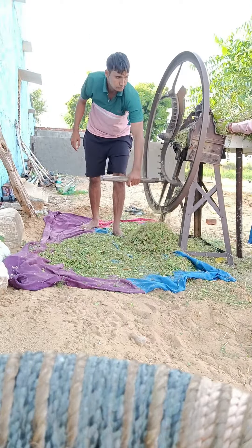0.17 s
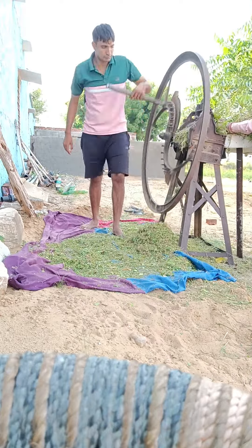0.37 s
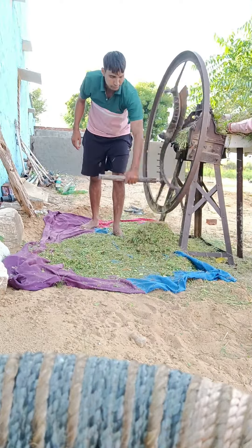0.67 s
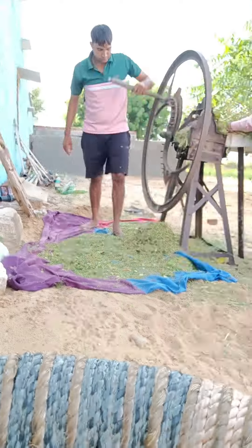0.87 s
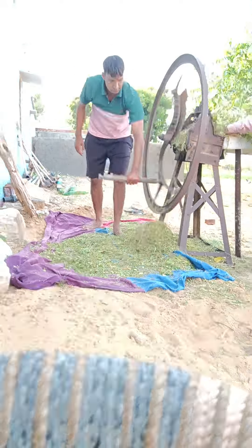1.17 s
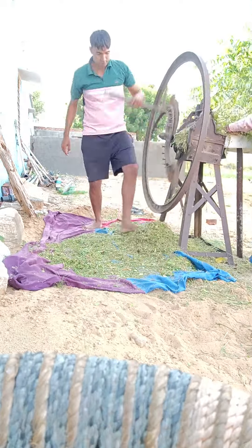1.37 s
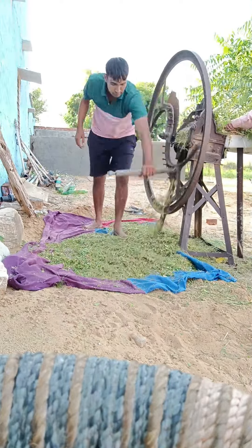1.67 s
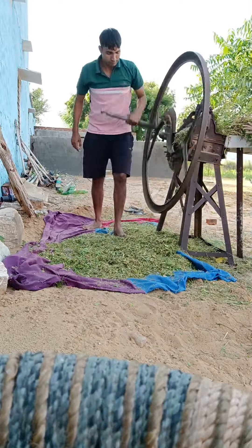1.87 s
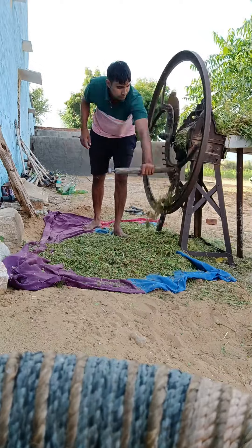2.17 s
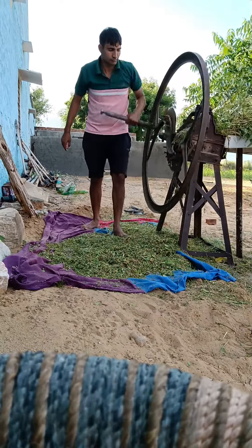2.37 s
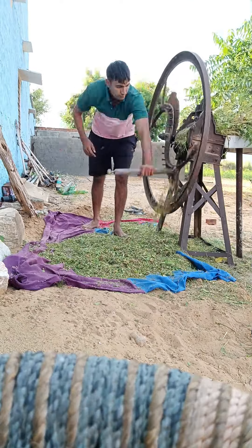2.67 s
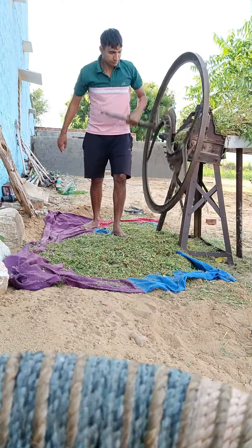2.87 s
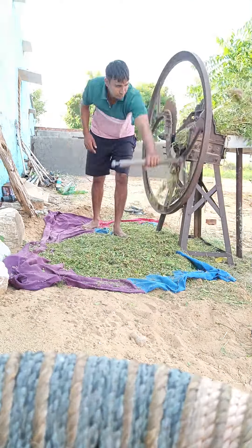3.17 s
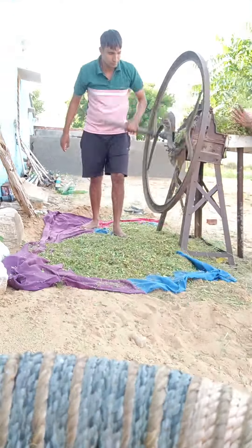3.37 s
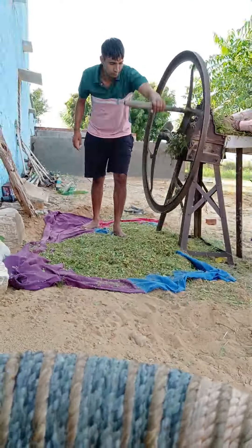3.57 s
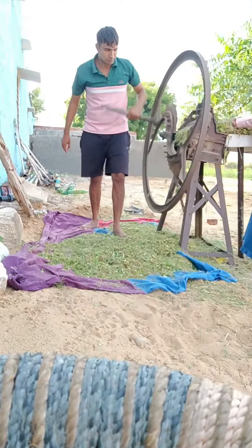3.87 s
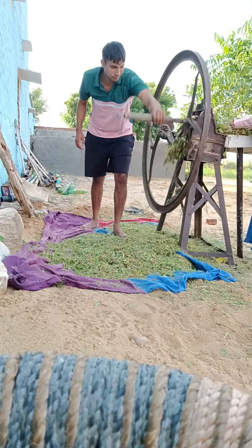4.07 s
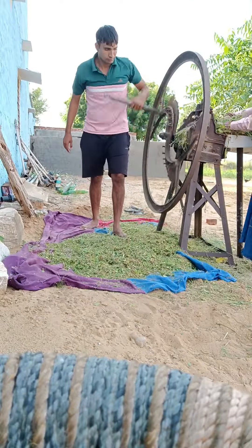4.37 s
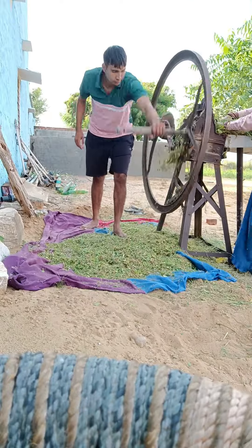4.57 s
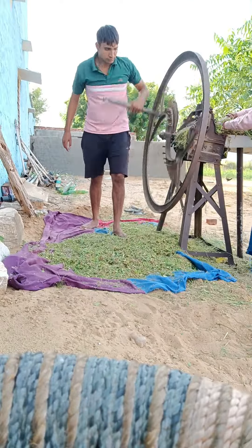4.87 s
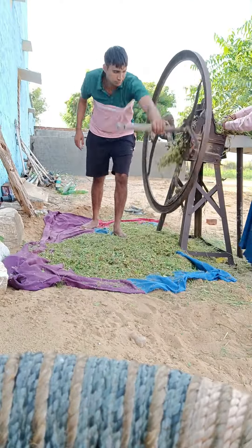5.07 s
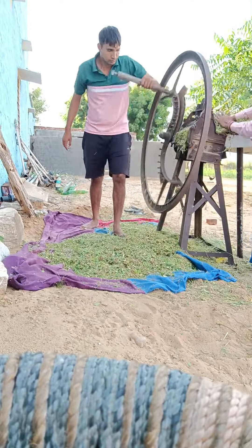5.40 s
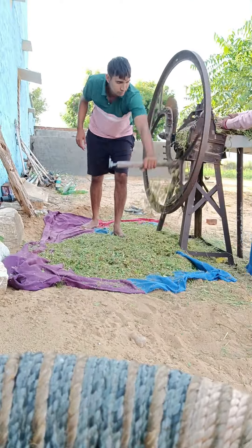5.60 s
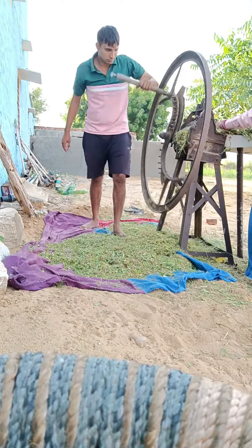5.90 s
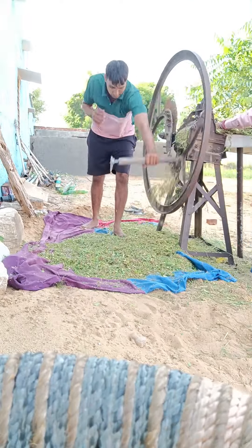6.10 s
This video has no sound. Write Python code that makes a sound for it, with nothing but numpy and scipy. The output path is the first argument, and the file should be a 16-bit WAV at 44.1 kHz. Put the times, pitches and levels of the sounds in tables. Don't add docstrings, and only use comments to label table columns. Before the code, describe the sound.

Fast alternating heavy and light chops through green stems, crisp tearing hiss, clanking loose gears and dull thuds in an open farmyard.

```python
import sys
import numpy as np
from scipy import signal
from scipy.fft import rfft, irfft
from scipy.io import wavfile
from scipy.ndimage import uniform_filter1d

SR = 44100
rng = np.random.default_rng(int(sys.argv[2]) if len(sys.argv) > 2 else 0)


def wav_record(signal):
    frames = np.transpose(np.atleast_2d(signal))
    bounded = np.clip(frames, -1, 1)
    quanta = np.round(bounded * 32767).astype(np.int16)
    wavfile.write(sys.argv[1], SR, quanta)


def amplitude_ratio(level_db):
    exponent = np.asarray(level_db, float) / 20
    return 10 ** exponent


N = 275184
T = np.arange(N) / SR


def level(x, db):
    return x * amplitude_ratio(db) / np.sqrt(np.mean(x ** 2))


def colour(x, points):
    hz, db = np.transpose(points)
    f = np.fft.rfftfreq(4096, 1 / SR)
    gain_db = np.maximum(np.interp(np.log(f + 1), np.log(hz), db), -70)
    cepstrum = irfft(np.log(amplitude_ratio(gain_db)))
    cepstrum[1:2048] *= 2
    cepstrum[2049:] = 0
    impulse = irfft(np.exp(rfft(cepstrum)))[:2048]
    return signal.fftconvolve(x, impulse)[:N]


def ring(x, hz, width_hz):
    return signal.lfilter(*signal.iirpeak(hz, hz / width_hz, fs=SR), x)


def walk(rate_hz):
    hold = int(SR / rate_hz)
    steps = np.repeat(rng.standard_normal(N // hold + 1), hold)
    return 1.826 * np.tanh(0.89 * uniform_filter1d(steps, hold)[:N])


def snaps(rate_hz, spread_db):
    happens, sign, size = rng.random((3, N))
    clicks = (happens < rate_hz / SR) * np.sign(sign - 0.5) * amplitude_ratio(-spread_db * np.log(size + 0.001))
    return level(clicks, 0)


# delay_s, level_db
WALL_ECHOES = [
    (.011, -17),
    (.023, -25),
    (0.038, -21),
]


def yard(cutter):
    t = T[:SR // 4]
    response = rng.standard_normal(len(t)) * amplitude_ratio(-60 * t / 0.11 - 31)
    for delay_s, db in WALL_ECHOES:
        response[int(delay_s * SR)] += amplitude_ratio(db)
    return signal.fftconvolve(ring(cutter, 1260, 980), response)[:N]


# start_s, peak_db, pitch_hz
GUSTS = [(0.085, -22.5, 120), (0.174, -30.5, 98), (0.56, -30.5, 176), (0.958, -37.5, 63),
         (1.176, -35, 70.0), (1.287, -34.5, 77.4), (1.476, -29.5, 97), (1.708, -39.5, 109),
         (5.899, -34, 103.4), (0.28, -43, 90), (0.399, -38.5, 85), (0.68, -41.5, 84), (0.79, -41, 111),
         (1.591, -36, 160), (2.019, -49, 153), (2.221, -48, 109), (2.389, -44, 128), (2.64, -33, 192),
         (3.371, -44, 107), (4.21, -40, 117), (5.391, -41, 88.6), (5.651, -41, 110)]


def thumps():
    out, t = np.zeros(N), T[:SR // 8]
    for start_s, db, hz in GUSTS:
        swing = np.sin(2 * np.pi * hz * t * (1 - 2 * t))
        swing *= (t / 0.0074) * np.exp(1 - t / 0.0082)
        i = int(start_s * SR)
        out[i:i + len(t)] += amplitude_ratio(db - 1) * swing
    return out


# time_s, level_db
BREEZE_LEVEL = [(0, -52), (0.15, -39.5), (0.45, -60.5), (0.9, -59), (1.1, -41), (1.4, -58), (1.6, -42.5),
                (1.8, -61), (2.5, -62), (2.85, -53.5), (3.1, -78), (4.0, -81), (5.0, -55), (5.9, -56),
                (6.24, -64)]


def heave():
    lull_db, full_thud_db, trim_thud_db = -60.5, -41, -48.5
    peaks = np.array([times[2] for times, *_ in strokes()]) + 0.032
    padded = np.r_[peaks[0] - 0.25, peaks, peaks[-1] + 0.25]
    s = np.interp(np.arange(-1, 2 * len(peaks)) / 2, np.arange(-1, len(peaks) + 1), padded)
    thud_db = np.resize([lull_db, full_thud_db, lull_db, trim_thud_db], len(s))
    breeze_db = np.interp(T, *np.transpose(BREEZE_LEVEL))
    return np.hypot(amplitude_ratio(np.interp(T, s, thud_db)), amplitude_ratio(breeze_db))


# frequency_hz, density_db_per_hz
WIND_SPECTRUM = [(12, -73), (20, -4.5), (98, -1), (161, 5), (300, -7.5), (390, -53), (660, -120)]


def rumble(crunch):
    wind = amplitude_ratio(6.4 * walk(22)) * level(colour(rng.standard_normal(N), WIND_SPECTRUM), -6.5)
    port = ring(ring(rng.standard_normal(N), 100.6, 123), 100.6, 123)
    boom = amplitude_ratio(4.9 * walk(25)) * level(port, -4.5)
    legs = level(ring(rng.standard_normal(N), 233, 233), -16)
    far = amplitude_ratio(1.1 * walk(13)) * level(ring(rng.standard_normal(N), 422, 180), -64)
    return (wind + boom) * heave() + uniform_filter1d(crunch, 900) * legs + far + thumps()


# start_s, level_db, low_mode_hz, chatter_ms
GEAR_CLACKS = [(1.032, -25, 910, 36), (1.081, -26, 810, 8.6), (1.517, -31.5, 1050, 25),
               (1.706, -41, 576, 26), (2.531, -41.5, 1020, 24), (3.01, -40.5, 1320, 15),
               (3.07, -20.5, 956, 13.5), (3.236, -37, 1300, 5.6), (3.356, -32.5, 760, 19),
               (3.595, -30.5, 1020, 36), (4.99, -40, 1290, 3.9), (5.011, -39, 1397, 2.7),
               (5.056, -30.5, 1500, 30), (5.302, -40, 1230, 76), (5.436, -42, 1200, 20),
               (5.488, -37.5, 1020, 51), (5.553, -29, 1610, 16), (5.954, -33.5, 1190, 17.5)]


def gear_clacks():
    return [(s, db, low_hz, 2300, -13, ms) for s, db, low_hz, ms in GEAR_CLACKS]


# start_s, level_db, high_mode_hz, chatter_ms
PLATE_CHOPS = [(0.364, -30.5, 3150, 26), (0.847, -17.5, 3220, 22.3), (1.322, -32, 3100, 26),
               (1.873, -45, 2410, 59), (2.898, -23.5, 3460, 24), (3.42, -17.5, 2270, 13.7),
               (3.897, -18.5, 2230, 17), (4.393, -24, 2220, 7.6), (4.858, -29.5, 2270, 52),
               (5.379, -22.5, 2300, 10.2), (5.843, -27.5, 3300, 32)]


def plate_chops():
    return [(s, db, 1460, high_hz, 13, ms) for s, db, high_hz, ms in PLATE_CHOPS]


# start_s, level_db, low_mode_hz, high_mode_hz, chatter_ms
ROLLER_KNOCKS = [(0.0, -25, 1090, 2570, 8.9), (0.04, -22, 884, 1890, 54), (0.233, -42.5, 1510, 2340, 37),
                 (1.292, -34.5, 940, 2000, 26), (1.485, -38, 1200, 2300, 20),
                 (1.568, -29.5, 1170, 2040, 52), (2.001, -31, 1310, 2290, 5.6),
                 (2.038, -43, 1350, 2440, 6.8), (2.092, -22, 1520, 1930, 21), (2.35, -40, 680, 1920, 7),
                 (3.536, -37, 1380, 2300, 23), (3.548, -33, 1120, 1920, 22), (3.82, -45, 1500, 3230, 16),
                 (4.075, -35, 1100, 2060, 16), (4.48, -36.5, 1420, 2530, 12), (4.506, -33, 1170, 2410, 3.9),
                 (4.523, -39.5, 1320, 2220, 40), (5.51, -26.5, 1290, 2050, 9.9),
                 (6.03, -35, 1550, 3240, 17)]


def roller_knocks():
    return [(s, db, low_hz, high_hz, -2.5, ms) for s, db, low_hz, high_hz, ms in ROLLER_KNOCKS]


# start_s, level_db, low_mode_hz, high_mode_hz, chatter_ms
BOLT_CLINKS = [(0.302, -31, 1600, 1920, 20), (0.49, -21.5, 1370, 2300, 20), (0.514, -30.5, 1500, 2320, 24),
               (0.636, -26, 970, 2010, 11), (0.779, -46, 1190, 2120, 8.3), (0.973, -40.5, 1730, 3370, 19),
               (1.741, -44.5, 1460, 2470, 24), (1.83, -41.5, 1520, 2020, 12), (2.572, -29.5, 880, 1920, 36),
               (3.058, -37, 644, 3020, 1.5), (3.122, -20, 744, 1950, 9.4), (4.557, -32, 1550, 2010, 50),
               (5.976, -22, 1630, 2410, 20.3)]


def bolt_clinks():
    return [(s, db, low_hz, high_hz, 9, ms) for s, db, low_hz, high_hz, ms in BOLT_CLINKS]


def pawl_bounces():
    start_s, gap_s = 2.006, 0.0066
    return [(start_s + k * gap_s, -27, 1350, 2400, -2, 1) for k in range(4)]


def knocks():
    out, push, tick = np.zeros((3, N))
    bounces = snaps(3000, 2.85)
    blows = gear_clacks() + plate_chops() + roller_knocks() + bolt_clinks() + pawl_bounces()
    for start_s, db, low_hz, high_hz, high_db, chatter_ms in blows:
        i = int(start_s * SR)
        t = T[:min(SR // 8, N - i)]
        shape = np.exp(-(1000 * t / max(chatter_ms, 2)) ** 4) + amplitude_ratio(-36 - 60 * t / 0.097)
        burst = shape * bounces[i:i + len(t)]
        burst[0] += 9
        tone = ring(burst, low_hz, low_hz / 10.5)
        tone -= amplitude_ratio(high_db) * ring(burst, high_hz, high_hz / 15.3)
        tone += amplitude_ratio(1.94 * max(high_db, 0) - 25) * ring(burst, 2280, 2200)
        loudness = tone[:int(SR * max(chatter_ms, 5) / 1000)].std()
        out[i:i + len(t)] += amplitude_ratio(db - 6.5) * tone / loudness
        push[i:i + len(t)] += amplitude_ratio(db) * shape
        tick[i:i + len(t)] += amplitude_ratio(db - 60 * t / 0.01)
    return signal.lfilter(*signal.butter(3, 4500, fs=SR), out), push, tick


# frequency_hz, width_hz, level_db
KNIFE_MODES = [(4430, 90, -23.5), (5090, 43, 1.5), (5930, 67, -1), (7530, 38, -23), (8980, 56, -8.5),
               (9570, 100, -17)]
# start_s, level_db, length_ms
GRIT_FLECKS = [(0.972, -45.5, 19), (1.745, -51, 14), (2.008, -62, 25), (3.548, -48, 6), (4.029, -48, 14),
               (4.504, -56, 6), (4.915, -48, 17), (4.968, -52, 6), (5.44, -60, 8), (5.96, -56, 8),
               (6.17, -66, 8.3)]


def flecks():
    gate, t = np.zeros(N + SR), T[:SR // 10]
    for start_s, db, length_ms in GRIT_FLECKS:
        i = int(start_s * SR)
        gate[i:i + len(t)] += amplitude_ratio(db) * np.exp(-(t * 1000 / length_ms) ** 2)
    grit = gate[:N] * snaps(4000, 2)
    tinkle = sum(ring(grit, hz, 2 * width_hz) for hz, width_hz, _ in KNIFE_MODES[1:])
    spray = ring(ring(grit, 8100, 7000), 8100, 7000)
    return amplitude_ratio(2.5) * tinkle + amplitude_ratio(-5) * spray


# frequency_hz, width_hz, level_db
FRAME_MODES = [(545, 138, -3), (786, 28.5, 11), (967, 34, -13), (1250, 13, 6.5), (1521, 48, 5),
               (1925, 109, 9), (2010, 244, 7), (2260, 110, -32), (2396, 75, 4), (2620, 160, -28),
               (2957, 200, 4.5), (3370, 107, 10.5), (4360, 160, -11), (4900, 39, -20)]
# frequency_hz, density_db_per_hz
CRUNCH_SPECTRUM = [(120, -15), (200, -8), (437, -10), (784, 1), (1290, 0), (1550, 1.5), (1740, -9),
                   (1920, -2), (3250, 2.5), (3920, -22.5), (6000, -26.5), (7800, -44), (13200, -120)]


def frame(crunch, rattle):
    stems = level(amplitude_ratio(1.75 * walk(120)) * snaps(5000, 2.1), 0)
    gears = amplitude_ratio(4.5 * walk(30) - 6.5) * level(ring(snaps(2500, 2.6), 1190, 1960), 0)
    push = crunch * stems + rattle * gears
    unit = np.sqrt(sum(amplitude_ratio(2 * db) * width_hz for _, width_hz, db in FRAME_MODES) * np.pi / SR)
    modes = np.zeros(N)
    for k, (hz, width_hz, db) in enumerate(FRAME_MODES):
        modes += (-1) ** k * amplitude_ratio(db) * ring(amplitude_ratio(7.72 * walk(70)) * push, hz, width_hz)
    blur = colour(push, CRUNCH_SPECTRUM) / colour(stems, CRUNCH_SPECTRUM).std()
    bite = amplitude_ratio(6.6 * walk(55)) * ring(push, 4060, 1400)
    return amplitude_ratio(-9) * modes / unit + amplitude_ratio(-4) * blur + amplitude_ratio(-20) * bite


# frequency_hz, density_db_per_hz
TEAR_SPECTRUM = [(2350, -12.5), (4000, -3.5), (4440, 2.5), (4820, -8.5), (6000, -10.5), (6510, -9),
                 (9490, -3), (10800, -9.5), (14700, -17), (16000, -26)]
# frequency_hz, density_db_per_hz
CHAFF_SPECTRUM = [(2060, -49), (3500, -11), (3730, 2), (4400, -4.5), (5600, -15), (7650, -12.5), (9500, -1),
                  (14800, -20), (16000, -25)]


def tearing(force, chaff):
    fibres = amplitude_ratio(2.2 * walk(150)) * level(snaps(9000, 3.3) + 2.2 * rng.standard_normal(N), 0)
    torn = force * fibres
    knife = sum(amplitude_ratio(db + 6 * walk(40)) * ring(torn, hz, width_hz) for hz, width_hz, db in KNIFE_MODES)
    patter = level(colour(amplitude_ratio(3.5 * walk(50)) * snaps(9000, 2), CHAFF_SPECTRUM), 0)
    hiss = colour(torn, TEAR_SPECTRUM) / colour(fibres, TEAR_SPECTRUM).std()
    return hiss + amplitude_ratio(3) * knife + chaff * patter


# bite_s, lead_in_ms, rise_ms, fall_ms, peak_hiss_db
FULL_BITES = [(0.038, 31, 24, 52, -35), (0.526, 5, 35, 49, -32.5), (1.025, 21, 38, 45.7, -35),
              (1.549, 31, 23, 68.3, -35.5), (2.084, 19.5, 40, 34.2, -33), (2.589, 19.6, 38.5, 37, -33),
              (3.07, 2.1, 57, 49, -36), (3.599, 5.1, 8.8, 54.7, -34), (4.078, 2.9, 18.5, 58, -34),
              (4.559, 3.6, 38.6, 41.4, -35.5), (5.052, 2.5, 42.8, 42, -36), (5.55, 10, 23.6, 43, -37.5),
              (6.033, 5.9, 22, 70, -36.5)]
FULL_CRUNCH_ABOVE = [14, 8.5, 11.96, 11.5, 17.1]


def full_cuts():
    edge_db, clear_ms = -56.5, 8.8
    rows = []
    for bite_s, lead, rise, fall, db in FULL_BITES:
        times = bite_s + np.cumsum([-lead, lead, rise, fall, clear_ms]) / 1000
        hiss_db = np.array([edge_db, db - 0.15 * rise, db, db - 6, edge_db])
        rows.append((times, hiss_db, hiss_db + FULL_CRUNCH_ABOVE))
    return rows


# bite_s, lead_in_ms, rise_ms, fall_ms, peak_hiss_db
STUB_TRIMS = [(0.304, 29, 41, 47, -43.5), (0.813, 38, 8.5, 60, -40), (1.321, 52, 8, 57, -36),
              (1.869, 42, 23, 28, -42.5), (2.362, 28, 44, 26, -43), (2.89, 53, 6.2, 34, -39),
              (3.405, 56, 14.7, 35, -38), (3.885, 55, 12, 30, -37.5), (4.358, 43, 17.4, 42.6, -38),
              (4.847, 48, 14.5, 47, -35.5), (5.325, 34, 21.6, 59, -38.5), (5.835, 50, 10.7, 52, -37)]
TRIM_HISS = [-63, -51, -60.5]
TRIM_CRUNCH = [-50.5, -36.5, -30.5, -31.5, -42]


def trim_cuts():
    exit_share = 0.46
    rows = []
    for bite_s, lead, rise, fall, db in STUB_TRIMS:
        steps_ms = [-lead, lead, rise, exit_share * fall, (1 - exit_share) * fall]
        hiss_db = np.insert(np.array(TRIM_HISS, float), 2, [db - 2, db - 6])
        rows.append((bite_s + np.cumsum(steps_ms) / 1000, hiss_db, TRIM_CRUNCH))
    return rows


def strokes():
    return sorted(full_cuts() + trim_cuts(), key=lambda row: row[0][0])


def passes(edge_s, fade_s):
    hiss, crunch = np.zeros(N), np.zeros(N)
    for k, (s, hiss_db, crunch_db) in enumerate(strokes()):
        near = slice(max(int((s[0] - edge_s) * SR), 0), int((s[-1] + 2 * fade_s) * SR))
        t = T[near]
        is_trim = k % 2
        stop = np.r_[s[:-1], s[-2] + 0.004 if is_trim else s[-1]]
        start = np.clip((t - s[0]) / edge_s + 1, 0, 1)
        hiss_fade_db = 60 * np.maximum(t - stop[-1], 0) / (0.5 * fade_s)
        crunch_fade_db = 60 * np.maximum(t - s[-1], 0) / fade_s
        hiss[near] += start * amplitude_ratio(np.interp(t, stop, hiss_db) - hiss_fade_db)
        crunch[near] += start * amplitude_ratio(np.interp(t, s, crunch_db) - crunch_fade_db)
    return hiss, crunch


def idle(turn_db):
    gap_s = 0.053
    s = np.ravel([(times[0] - gap_s, times[-1] + gap_s) for times, *_ in strokes()])
    return amplitude_ratio(np.interp(T, s, np.resize(turn_db, len(s))))


RATTLE_TURN = [-50, -52.5, -59.5, -58]
CHAFF_TURN = [-69, -66.5, -66, -76]


def scene():
    hiss, crunch = passes(0.0066, 0.19)
    clank, shake, tick = knocks()
    rattle = idle(RATTLE_TURN)
    cutter = clank + frame(crunch + amplitude_ratio(-13) * shake, rattle)
    cutter += tearing(hiss + amplitude_ratio(-50) * tick + amplitude_ratio(-70) * shake, idle(CHAFF_TURN))
    wet = yard(cutter)
    return (cutter + wet + rumble(crunch + amplitude_ratio(7.5) * rattle) + flecks())[None]


def roll_off(x):
    return signal.sosfilt(signal.butter(12, 16230, fs=SR, output="sos"), x)


def record(dry):
    top = signal.ellip(10, 0.3, 70, 15750, fs=SR, output="sos")
    mix = signal.sosfilt(top, dry)
    return roll_off(mix)


dry = scene()
out = record(dry)
wav_record(out)
```